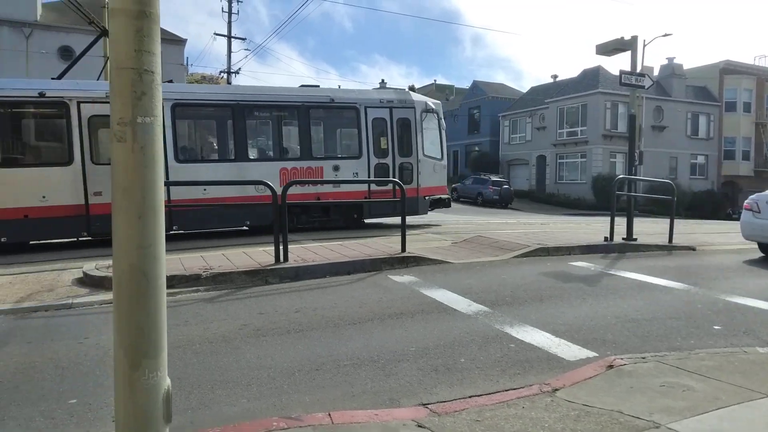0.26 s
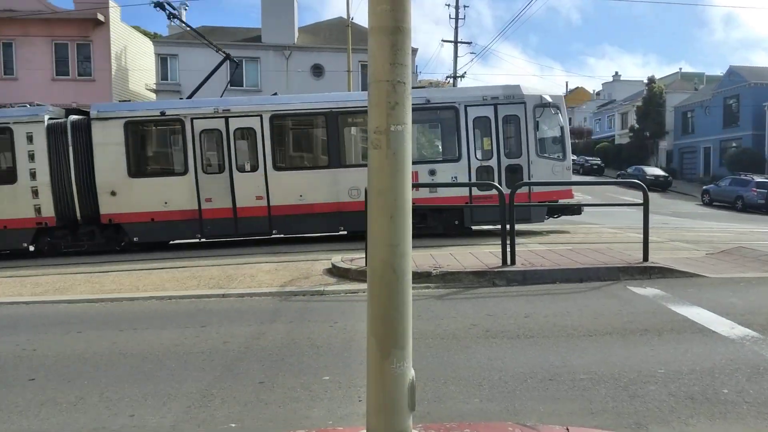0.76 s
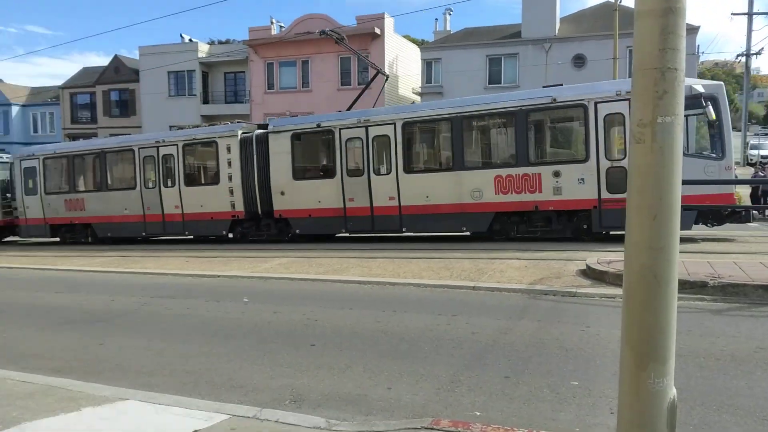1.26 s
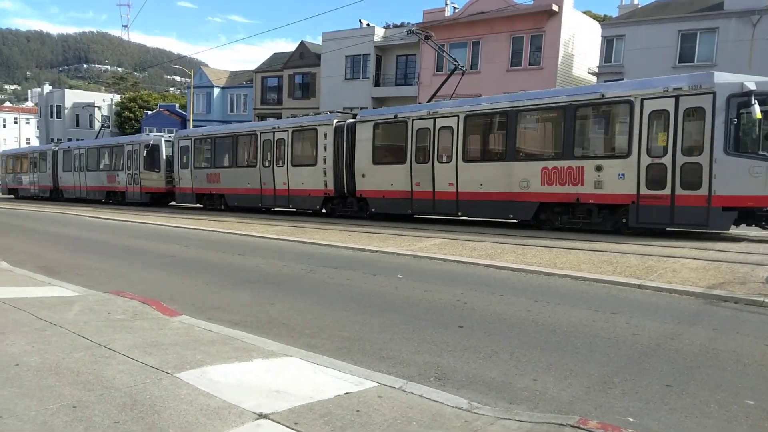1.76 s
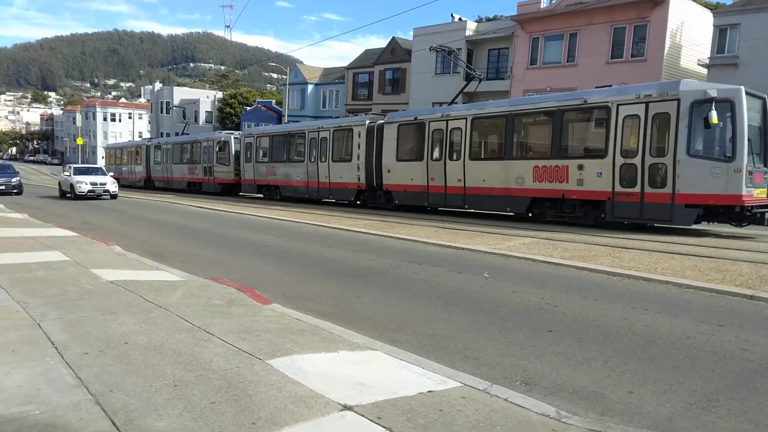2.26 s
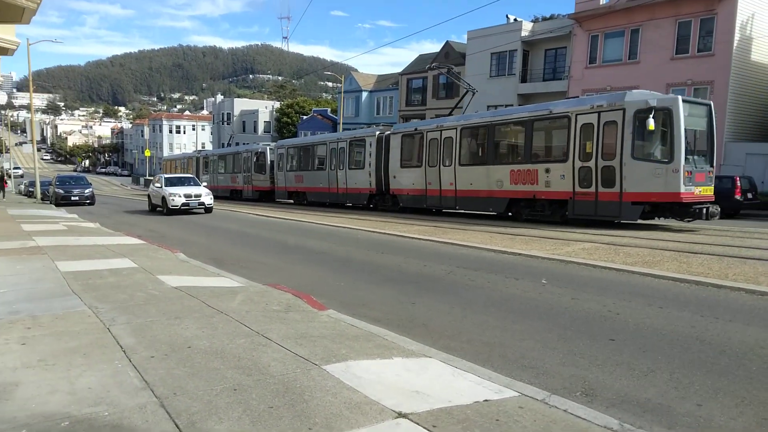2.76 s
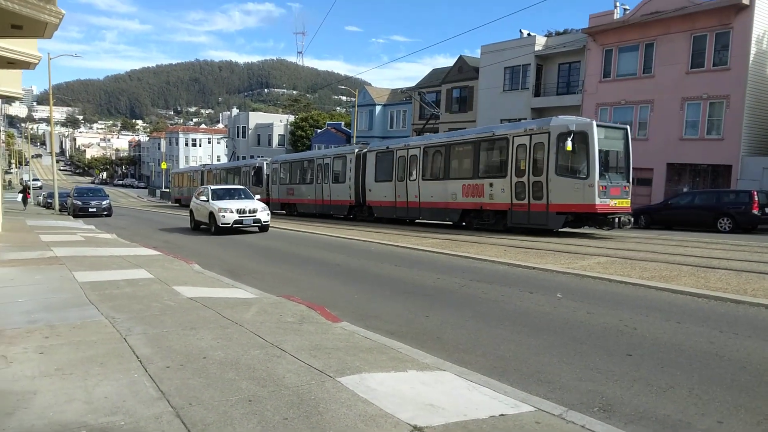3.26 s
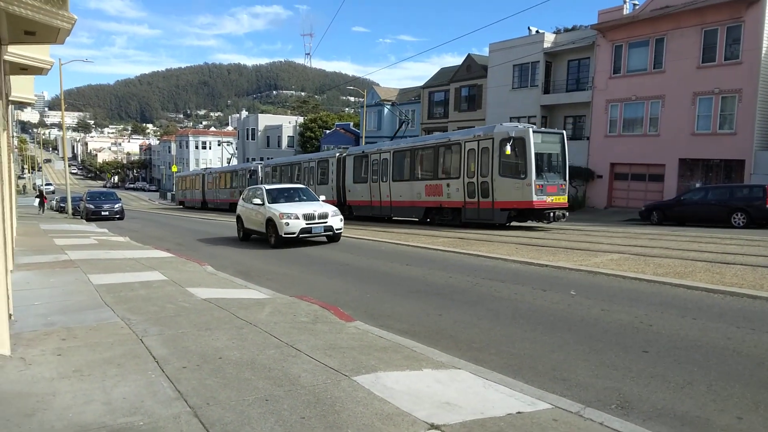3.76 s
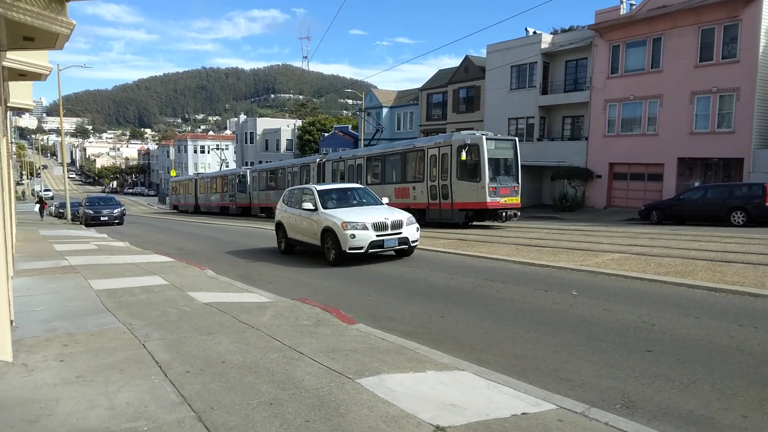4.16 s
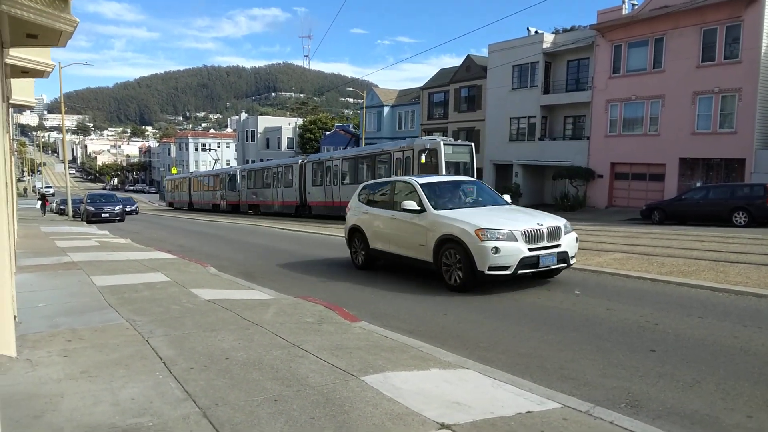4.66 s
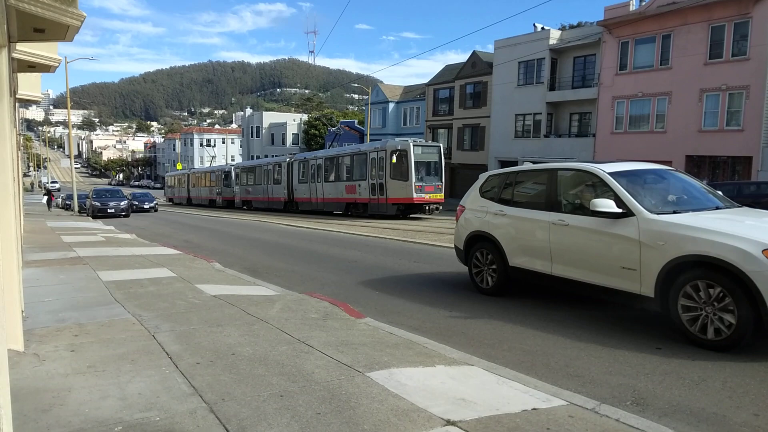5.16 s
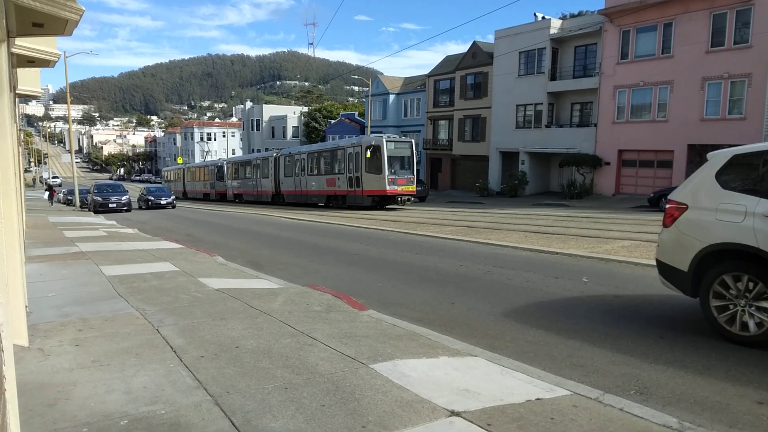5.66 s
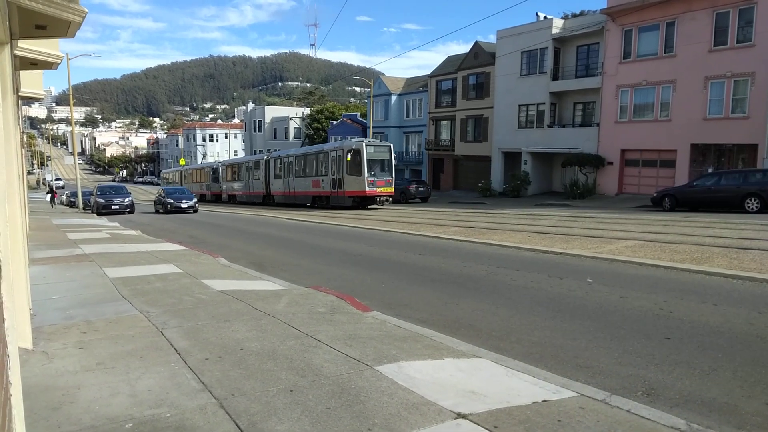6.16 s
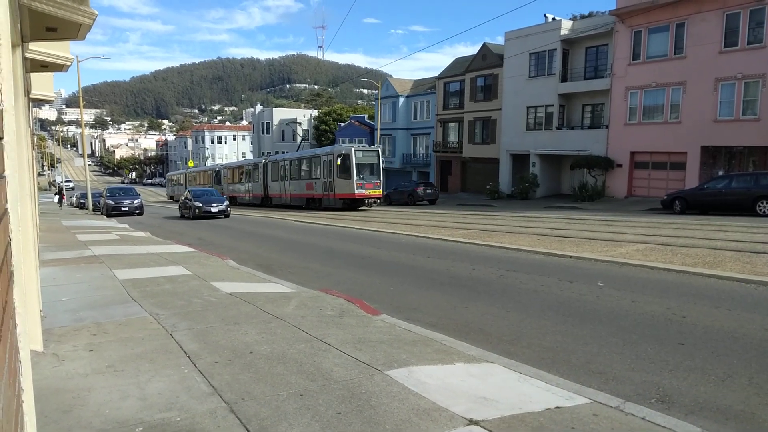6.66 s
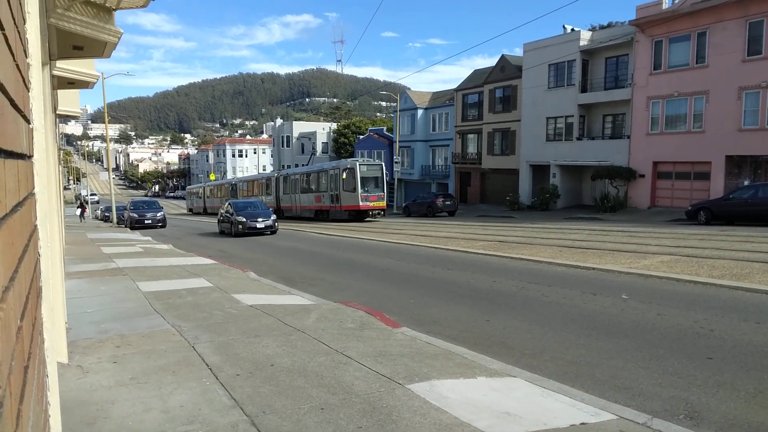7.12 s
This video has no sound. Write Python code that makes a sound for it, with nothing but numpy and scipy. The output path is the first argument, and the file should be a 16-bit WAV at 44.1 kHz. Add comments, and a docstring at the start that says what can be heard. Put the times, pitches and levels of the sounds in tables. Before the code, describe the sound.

Outdoors on a street, wind rumbles on the microphone while an electric light rail train passes close by, whining and buzzing over the roll of its wheels. A few soft, irregular knocks come from the rail joints, mostly in the first half. The train gradually fades and a car's tyres swish softly by. The gusts then take over, thumping and snapping on the right side with brief distortion.

```python
"""A street where an electric light rail train rolls past and draws away, with two cars on the road.
The train is rumble, rolling noise and hiss, a resonant whine, the pulse buzz of its two power
choppers and soft knocks of the wheels over rail joints. Gusts buffet the two microphone ports
of a small camera, the right one hard enough to overload it."""
import sys
import numpy as np
from scipy import signal
from scipy.fft import rfft, irfft, next_fast_len
from scipy.io import wavfile
from scipy.ndimage import uniform_filter1d, map_coordinates

SR = 44100
rng = np.random.default_rng(int(sys.argv[2]) if len(sys.argv) > 2 else 0)


def bounce(signal):
    """Save signal as a 16-bit WAV file at the path given by the first command-line argument."""
    frames = np.transpose(np.atleast_2d(signal))
    limited = np.clip(frames, -1, 1)
    pcm = np.round(limited * 32767).astype(np.int16)
    wavfile.write(sys.argv[1], SR, pcm)


N = 325896


def amp(db):
    """Decibels to gain."""
    return 10 ** (np.asarray(db) / 20)


def unit(x):
    """Scaled to rms 1."""
    return x / np.sqrt(np.mean(x ** 2) + 1e-20)


def panned(db):
    """Left and right gains for a pan given in dB of left over right."""
    return amp([db / 2, -db / 2])


def along(points, hz):
    """Interpolates (Hz, value) points on a log frequency axis."""
    freqs, values = np.transpose(points)
    return np.interp(np.log(hz + 1), np.log(freqs + 1), values)


def eq(points):
    """Frequency response through (Hz, dB) points."""
    return lambda hz: amp(along(points, hz))


def peaks(modes):
    """Frequency response of summed (Hz, width in Hz, dB) resonances."""
    return lambda f: sum(amp(db) * f * w / np.abs(c * c - f * f + 1j * f * w) for c, w, db in modes)


def curves(rows):
    """One value per sample for each column after the time."""
    times, *columns = np.transpose(rows)
    return np.array([np.interp(np.arange(N) / SR, times, column) for column in columns])


def wobble(rate):
    """A smooth random curve, rate knots a second."""
    return map_coordinates(rng.standard_normal(int(N * rate / SR) + 4), [np.arange(N) * rate / SR])


def bump(t, half):
    """A flat-topped fade in and out around t = 0, down to 1/e at the half-length."""
    return np.exp(-(t / half) ** 4)


def filtered(x, response):
    """x shaped by a frequency response."""
    n = x.shape[-1]
    size = next_fast_len(n + 8192)
    return irfft(rfft(x, size) * response(np.fft.rfftfreq(size, 1 / SR)), size)[..., :n]


def rush(response, patchy_db):
    """Coloured stereo noise of rms 1 with patches of random gain, narrow in the bass and wide above."""
    # Stereo image. Each row: frequency in Hz, left-right correlation.
    likeness = [(60, 0.87), (170, 1), (510, 0.76), (1470, 0.071), (4250, -0.026), (12300, -0.21)]
    spectra = signal.stft(rng.standard_normal((2, N)), nperseg=512)[2]
    patches = uniform_filter1d(rng.standard_normal(spectra.shape[1:]), size=6, axis=0)
    patches = uniform_filter1d(patches, size=12, axis=1)
    pair = signal.istft(spectra * amp(patchy_db * unit(patches)), nperseg=512)[1][:, :N]
    width = lambda hz: np.arccos(np.clip(along(likeness, hz), -1, 1)) / 2
    mid, side = filtered(pair, lambda hz: response(hz) * [np.cos(width(hz)), np.sin(width(hz))])
    return unit(np.array([mid + side, mid - side]))


def cars():
    """Tyres on asphalt, one car leaving at the start and another passing late."""
    # Traffic fader. Each row: time in seconds, level in dB.
    fader = [(0, -30.5), (.5, -28.5), (1.2, -67), (3.5, -70), (4.6, -46), (5.5, -39), (6.3, -34.5),
             (7.39, -34.5)]
    # Tyre tone. Each row: frequency in Hz, relative level in dB.
    tone = [(150, -46), (350, 3.5), (600, -5.5), (900, -16), (1500, -23.5), (2400, -11.5), (3000, -18.5),
            (5600, -36.5), (8000, -55), (12000, -94)]
    return amp(curves(fader)[0]) * rush(eq(tone), patchy_db=-1.0)


def flap_envelopes():
    """Small eddies hit a port: each gives a flap, a wider surge of air and a brief flick of speed."""
    # Each row: centre in seconds, port (0 left, 1 right), level in dB, half-length in milliseconds.
    hits = [(0.292, 0, -15, 20), (0.44, 1, -15, 6.8), (1.438, 1, -14.5, 9.6), (1.464, 1, -17, 15),
            (1.489, 0, -12, 6.2), (1.519, 0, -6.5, 3.2), (1.533, 0, -9.5, 2.2), (2.24, 1, -13, 11),
            (3.361, 1, -14, 7.8), (4.668, 1, -7, 6.9), (4.758, 1, -13, 2.92), (4.77, 1, -17.5, 2.25),
            (4.785, 1, -13, 3), (4.797, 1, -11, 3.1), (4.815, 1, -13, 3.14), (4.833, 1, -13, 3.5),
            (4.864, 1, -7.5, 5.2), (4.877, 1, -11, 3.3), (4.884, 1, -9.5, 2.9), (5.007, 1, -13.5, 6.14),
            (5.204, 1, -16.5, 8.1), (5.746, 1, -9, 6.06), (5.807, 1, -12.5, 7), (5.923, 1, -12, 4.45),
            (5.934, 1, -12, 4.3), (6.017, 1, -9, 4.85), (6.059, 1, -13, 8.9), (6.094, 1, -5, 4.8),
            (6.192, 1, -15.5, 17.2), (6.246, 1, -4.5, 9.8), (6.3, 1, -2.5, 6.36), (6.342, 1, -6, 6.2),
            (6.361, 1, -3, 9.1), (6.376, 1, -2, 7.05), (6.391, 1, -4.5, 7.14), (6.419, 1, -7, 4.7),
            (6.423, 0, -18, 13), (6.472, 1, -7.5, 11), (6.518, 1, -11, 18.2), (6.549, 1, -11, 5.36),
            (6.602, 1, -9.5, 6.75), (6.637, 1, -15, 11.2), (6.679, 1, -7.5, 15.4), (6.708, 1, -6, 5),
            (6.735, 1, -10, 6.9), (6.752, 1, -6.5, 4), (6.762, 1, -4, 5.04), (6.779, 1, -4, 5.94),
            (6.808, 1, -1.5, 4.88), (6.82, 1, -5, 2.8), (6.83, 1, -2.5, 6.03), (6.84, 1, -4, 3.5),
            (6.87, 1, -13, 4.35), (7.081, 1, -6, 4.13), (7.091, 1, -2, 4.93), (7.184, 1, -11, 27.7),
            (7.232, 1, -7.5, 9.7)]
    surge_db, surge_s, flick_db, flick_s = -9, .012, 5, .0012
    pad = 4096
    t = np.arange(-pad, pad) / SR
    flaps, surge_power, flicks = np.zeros((3, 2, N + 2 * pad))
    for centre, port, db, half_ms in hits:
        span = np.s_[round(port), round(centre * SR):round(centre * SR) + len(t)]
        flaps[span] += amp(db) * bump(1000 * t, half_ms)
        surge_power[span] += amp(db + surge_db) ** 2 * np.exp(-(t / surge_s) ** 2)
        flicks[span] += flick_db * np.exp(-(t / flick_s) ** 2)
    return [envelope[:, pad:N + pad] for envelope in (flaps, surge_power, flicks)]


def flutter(flaps, flicks):
    """Bright flaps: a flat-topped pressure swing that lurches in speed, quickest in mid-flap."""
    # Crackle tone. Each row: frequency in Hz, relative level in dB.
    tone = [(300, -15), (700, 12.5), (1000, -9), (1800, -17), (2800, -26), (5000, -41), (9000, -100)]
    base_hz, fastest_hz = 210.2, 1200
    speed = amp([3 * wobble(120) + 3.5 * wobble(600) + 4 * flap + flick
                 for flap, flick in zip(flaps, flicks)])
    phase = 2 * np.pi * np.cumsum(np.minimum(base_hz * speed, fastest_hz), axis=1) / SR
    swing = flaps * np.tanh(1.46 * np.sin(phase))
    crackle = unit(filtered(rng.standard_normal((2, N)), eq(tone)))
    return swing + amp(-11.5) * flaps ** 2 * crackle  # only the hardest flaps break up into noise


def buffeting(db):
    """Low eddies at one port; faster air is louder and carries them by more quickly."""
    # Eddy tone at normal speed. Each row: frequency in Hz, relative level in dB.
    tone = [(12, -6), (30, -3), (60, 1), (100, 1), (180, -4.5), (300, -14), (500, -26), (900, -44.5),
            (2000, -93), (6000, -110)]
    lumps_db = 1.1 * wobble(25)
    speed = np.clip(amp(.2 * (db + 15) + .4 * lumps_db + 1.2 * wobble(40)), .3, 2)
    position = np.cumsum(speed)
    eddies = unit(filtered(rng.standard_normal(round(position[-1]) + 8), eq(tone)))
    passing = map_coordinates(eddies, [position], order=1)
    return amp(db) * unit(amp(lumps_db) * np.tanh(1.2 * passing))  # wide swings even out


def wind():
    """Gusts flap and buffet each port on its own, with sharp snaps on the right."""
    # Steady push of the air. Each row: time in seconds, left level in dB, right level in dB.
    push = [(0, -28, -20.5), (.45, -27, -17), (1.05, -23, -27), (1.25, -19, -20), (2, -28, -26),
            (2.5, -22, -22), (2.9, -30, -24), (3.5, -27, -20), (3.85, -29.5, -23), (4.1, -29, -17),
            (4.28, -27, -28), (4.38, -24, -15.5), (4.6, -22, -17), (4.655, -16, -14), (4.67, -12.5, -7),
            (4.685, -15, -21.5), (4.745, -19, -19), (4.757, -23.5, -5.5), (4.815, -21, -5.5),
            (4.835, -19, -9), (4.88, -18, -8.5), (4.892, -14, -21), (4.97, -20.5, -18), (5.06, -16, -18),
            (5.3, -29, -15), (5.65, -26, -17), (5.93, -27, -15), (6.02, -15.5, -11), (6.12, -22, -9.5),
            (6.21, -17, -13), (6.245, -20, -4), (6.265, -22.5, -17), (6.285, -23, -15), (6.295, -23.5, -3),
            (6.4, -18, -5), (6.48, -10, -4), (6.495, -11, -15), (6.515, -12.5, -15), (6.525, -12, -4),
            (6.55, -15, -7), (6.565, -14.5, -15), (6.59, -15, -14), (6.6, -14.5, -5.5), (6.615, -14, -13),
            (6.66, -14, -12), (6.69, -14, -5), (6.715, -15, -11), (6.74, -15, -5), (6.8, -15, -6),
            (6.84, -15, -6), (6.87, -14, -7), (6.92, -18, -11), (6.97, -23.5, -17), (7.05, -12, -17.5),
            (7.13, -17.5, -13.5), (7.2, -19, -10), (7.26, -20.5, -16), (7.39, -20, -9.5)]
    # Sudden pressure edges. Each row: start in seconds, level in dB.
    snaps = [(5.962, -14), (6.0671, -14), (6.0984, -12), (6.2385, -27), (6.251, -4), (6.299, -11),
             (6.306, -4), (6.317, -16.5), (6.3298, -14), (6.341, -7.5), (6.362, -3), (6.3761, -15),
             (6.3814, -16), (6.4692, -19), (6.484, -17), (6.5217, 1), (6.5341, -9), (6.597, -7),
             (6.6759, -13), (6.6965, -18), (6.746, -12), (6.7546, -12), (6.7615, -8), (6.7707, -16),
             (6.7786, 0), (6.789, -14), (6.8081, -10), (6.8131, -9), (6.8206, -16), (6.8279, -2),
             (6.832, -5), (6.84, -9), (6.869, -17), (7.0823, -16), (7.09, 1), (7.221, -20), (7.2312, -10.5)]
    flaps, surge_power, flicks = flap_envelopes()
    pressure = flutter(flaps, flicks)
    for port, steady_db in enumerate(curves(push)):
        gust_db = 10 * np.log10(amp(steady_db + 1.4 * wobble(11)) ** 2 + surge_power[port])
        pressure[port] += (1 + .9 * flaps[port]) * buffeting(gust_db)  # a flap rides a stronger push
    t = np.arange(400) / SR
    edge = (1 - np.exp(-t / .0001)) * np.exp(-t / .0012)
    for start, db in snaps:
        right = pressure[1, round(start * SR):][:len(t)]
        right -= np.sign(right[0]) * amp(db) * edge  # kicks against the swing
    return pressure


def knocks():
    """Wheels strike rail joints; the street smears the blows into short puffs that ring in the wheels."""
    # Each row: start in seconds, clack level in dB, thud level in dB, attack and 60 dB decay in seconds.
    blows = [(0.4898, -50, -47, .003, .23), (0.823, -29, -26, .003, 0.26), (0.9294, -36, -30, .003, .23),
             (1.1014, -46, -20, 0.0017, 0.082), (1.485, -51, -46, .003, .23),
             (2.0863, -27, -28, .003, 0.19), (2.5227, -33.5, -29, .003, .23), (2.7894, -36, -45, .006, 0.2),
             (2.8868, -40.5, -32.5, .003, 0.26), (2.9394, -37, -35, 0.0028, 0.2),
             (3.2744, -34, -27, 0.016, 0.36), (4.779, -33, -27.5, 0.0055, 0.31)]
    # Tones of the bright clack and the duller thud. Each row: frequency in Hz, relative level in dB.
    clack_tone = [(1000, -46), (3000, 1.5), (4500, -4), (5500, -7), (6800, -5), (7800, -4.5), (10500, -14),
                  (13000, -30), (16000, -32)]
    thud_tone = [(300, -28), (700, 5.5), (1800, 5), (3500, -3), (5000, -35), (8000, -90)]
    # Wheel resonances. Each row: frequency in Hz, width in Hz, relative level in dB.
    wheel_modes = [(2590, 64, -5), (2750, 100, -8), (3800, 480, 8.5), (4250, 16, 14), (4200, 24, -7),
                   (4500, 11, -3), (4660, 19, 2), (5200, 87, -16), (5540, 98, -24), (7560, 230, -14)]
    clack_level, thud_level = np.zeros((2, N + SR))
    t = np.arange(SR // 4) / SR
    for start, clack_db, thud_db, attack, t60 in blows:
        puff = amp(-60 * t / t60) * (1 - np.exp(-t / attack))
        clack_level[round(start * SR):][:len(t)] += amp(clack_db) * puff
        thud_level[round(start * SR):][:len(t)] += amp(thud_db) * puff
    clack = rush(lambda hz: eq(clack_tone)(hz) * (amp(-5) + peaks(wheel_modes)(hz)), patchy_db=1.2)
    thud = rush(eq(thud_tone), patchy_db=2.1)
    return clack_level[:N] * clack + thud_level[:N] * thud


def rumble(loss_db):
    """The low weight of the rolling train."""
    # Rumble tone. Each row: frequency in Hz, relative level in dB.
    tone = [(12, -51), (20, -12.5), (81, 3), (140, -1), (189, 0), (277, -2.5), (549, -24.5), (634, -17),
            (900, -29), (1170, -14), (1980, -120)]
    return amp(-19.5 - .94 * loss_db + .23 * wobble(4.4)) * rush(eq(tone), patchy_db=1.0)


def rolling(loss_db, shake):
    """Midrange roar of wheels on uneven rail."""
    # Rolling tone. Each row: frequency in Hz, relative level in dB.
    tone = [(250, -1), (450, -4), (700, -0.5), (950, -17), (1400, -9), (1850, -4.5), (2300, -11),
            (2900, -10.5), (3230, -9.5), (3370, -4.5), (3560, -10), (3720, -12.5), (4200, -15.5),
            (7000, -97)]
    return amp(-30 - .81 * loss_db + 1.44 * shake) * rush(eq(tone), patchy_db=.83)


def hiss(loss_db, shake):
    """The train's flickering treble noise."""
    # Hiss tone. Each row: frequency in Hz, relative level in dB.
    tone = [(2500, -36), (3500, 2), (4350, -19.5), (4900, -10), (5400, -15), (6460, -19.5), (7720, -13.5),
            (8500, -21.5), (9100, -27.5), (10500, -27.5), (11300, -41.5), (11900, -40), (12700, -37),
            (13300, -39), (16000, -46)]
    return amp(-39.5 - .97 * loss_db + .2 * shake) * rush(eq(tone), patchy_db=2.6)


def whine(pan_db):
    """Narrow resonances near 1.1 kHz that drift, thin out with distance and at times firm into a tone."""
    # Resonances close by and from afar. Each row: frequency in Hz, width in Hz, relative level in dB.
    near_modes = [(1081.5, 23, 5.5), (1037, 22, -5), (1112, 26, -2.5), (946, 54, -9.5)]
    far_modes = [(1085, 11.5, 1), (1123, 12, -4)]
    # Near-to-far crossfade. Each row: time in seconds, far share of the power.
    crossfade = [(0, 0), (4.6, .1), (5.5, .8), (7.39, .92)]
    # Pitch drift. Each row: time in seconds, percent sharp.
    glide = [(0, 0), (.3, -.6), (.7, -.8), (1.2, 1), (1.9, .8), (2.6, .5), (3.2, 0), (4, .5), (4.8, .3),
             (5.6, -.4), (6.3, .5), (7.39, 0)]
    # Clear tones. Each row: centre in seconds, pitch in Hz, peak in dB over the noise,
    # half-length in seconds.
    clear_tones = [(.2, 1080, 1, .13), (2.6, 1083, -1, .22), (5.65, 1097, -1, .2), (6.3, 1097, 0, .1),
                   (7.0, 1095, 1, .12)]
    # Whine fader. Each row: time in seconds, level in dB.
    fader = [(0, -28), (.3, -29), (.57, -34.5), (.72, -30), (1.75, -29), (2.8, -29.5), (3.05, -33),
             (3.3, -32), (3.43, -34.5), (3.55, -31.5), (4.1, -33.5), (4.9, -37.5), (5.6, -35.5),
             (6.15, -35), (6.3, -30.5), (6.6, -33), (6.85, -35), (7.05, -32.5), (7.2, -37.5), (7.39, -35)]
    near, far = (rush(lambda hz: peaks(modes)(hz) / (1 + (hz / 2500) ** 4), patchy_db=-.4)
                 for modes in (near_modes, far_modes))
    far_share = curves(crossfade)[0]
    ring = np.sqrt(1 - far_share) * near + np.sqrt(far_share) * far
    position = np.cumsum(1 + curves(glide)[0] / 100)
    ring = np.array([map_coordinates(side, [position], mode='mirror') for side in ring])
    t = np.arange(N) / SR
    for centre, hz, db, half in clear_tones:
        phase = 2 * np.pi * np.cumsum(hz + 6 * wobble(12)) / SR
        ring += amp(db) * bump(t - centre, half) * np.sin(phase)
    return amp(curves(fader)[0] + .66 * wobble(9)) * panned(pan_db) * ring


def chopper_pulses(pitch_hz):
    """Two power choppers, slightly out of tune: each pulse train gives a comb of harmonics."""
    # Each row: detuning in percent, relative level in dB.
    choppers = [(0, 0), (.36, -5)]
    comb, taps = np.zeros(N), np.arange(-8, 8)
    for detune, db in choppers:
        rate = pitch_hz * (1 + (detune + .035 * wobble(9)) / 100)
        turns = np.cumsum(rate) / SR
        onsets = np.flatnonzero(np.diff(np.floor(turns))) + 1
        late = turns[onsets] % 1 * SR / rate[onsets]  # part of a sample since the pulse
        pulses = np.sinc(taps + late[:, None]) * np.hanning(18)[1:-1]
        samples = np.clip(onsets[:, None] + taps, 0, N - 1)
        comb += amp(db) * np.bincount(samples.ravel(), pulses.ravel(), N)
    return comb


def chopper_buzz(loss_db):
    """The choppers' buzz dulls as the train fades; reflections make every harmonic fade on its own."""
    # Chopper pitch. Each row: time in seconds, pulses per second.
    pulse_rate = [(0, 199.1), (.4, 198.8), (.9, 198.2), (1.5, 197.8), (2.2, 197.6), (4.4, 197.6),
                  (5.5, 197.85), (6.7, 198.3), (7.39, 198.4)]
    # Buzz tone. Each row: frequency in Hz, relative level in dB.
    tone = [(1500, -35), (3000, -7), (3500, 10), (4000, -1), (4300, 0.5), (4550, 2), (4750, 3.5),
            (4950, 0.5), (5300, -8.5), (5900, -6.5), (6400, -10.5), (6900, -2.5), (7200, -20), (7520, -11),
            (8500, -9.5), (9500, -15.5), (11250, -15.5), (11900, -25), (12600, -11.5), (13000, -12),
            (13300, -83)]
    # Single harmonics swell or dip. Each row: centre in seconds, harmonic number, gain in dB,
    # half-length in seconds.
    swells = [(0.971, 24, 4.5, .2), (0.77, 22, 4.5, .2), (1.15, 23, -2, 0.09), (3.5, 20, 11, 0.22),
              (1.8, 21, 2, 0.23), (2.1, 25, 4, 0.44), (2.1, 24, 5, 0.37), (2.7, 22, 5, 0.24),
              (2.45, 23, 3, .25), (2.753, 24, 2, 0.27), (3.25, 20, 5, .2), (4.2, 38, 15, 0.98),
              (6, 24, 6.5, 0.49)]
    dulling = .085  # dB per kHz for each dB of level loss
    level = amp(-44 - .69 * loss_db + 1.6 * wobble(3.9))
    pitch_hz = curves(pulse_rate)[0]
    hz, t, spectra = signal.stft(chopper_pulses(pitch_hz), SR, nperseg=2048)
    frame_loss_db = np.interp(t, np.arange(N) / SR, loss_db)
    gain_db = along(tone, hz)[:, None] - dulling * np.outer(hz / 1000, frame_loss_db)
    for centre, harmonic, db, half in swells:
        band = np.abs(hz / pitch_hz.mean() - round(harmonic)) < .5
        gain_db += db * np.outer(band, bump(t - centre, half))
    reflections = uniform_filter1d(rng.standard_normal((2, *spectra.shape)), size=7, axis=1)
    reflections = unit(uniform_filter1d(reflections, size=14, axis=2))
    spectra = spectra * amp(gain_db + 2.2 * reflections) * np.exp(1.5j * reflections[::-1])
    return level * unit(signal.istft(spectra, SR, nperseg=2048)[1][:, :N])


def train():
    """Rumble, rolling, whine, hiss and buzz draw away together; the air takes the top first."""
    # Each row: time in seconds, level loss in dB, whine pan and treble pan in dB. The train fades
    # with distance, then ducks briefly near 6.9 s as the camera's gain control dips.
    moves = [(0, 0, 4, -13.5), (.5, 0.5, -5.5, -9.5), (1, -0.5, -6.5, -8), (1.6, 0, -5, -6),
             (2.3, 1.5, -2.5, -3), (3, 3.5, -3.5, -1), (3.7, 5.5, -6, -1.5), (4.4, 7, -4.5, -4.5),
             (5.5, 7.5, -6.5, -3), (6.8, 8.5, -4.5, -3.5), (6.92, 13, -2.5, -7), (7.39, 10.5, -7, -7)]
    loss_db, whine_pan, treble_pan = curves(moves)
    shake = wobble(8)  # uneven rail shakes rolling and hiss together
    body = rumble(loss_db) + rolling(loss_db, shake) + whine(whine_pan)
    treble = panned(treble_pan) * (hiss(loss_db, shake) + chopper_buzz(loss_db))
    top = filtered(treble, lambda hz: 1 / (1 + (9500 / (hz + 1)) ** 8))
    lost_top = (1 - amp(-.16 * loss_db)) * top
    return body + treble - lost_top


def scene():
    """The street as coloured by each port, with the wind on top."""
    # Port colouring. Each row: frequency in Hz, left over right in dB.
    port_balance = [(300, 0.5), (1300, 1), (1900, 2.5), (2500, -3.5), (3500, 4), (5000, 8.5), (7500, 13.5),
                    (8800, 11.5), (10000, -9.5), (11500, -16.5), (12600, -1)]
    street = train() + knocks() + cars()
    return filtered(street, lambda hz: panned(along(port_balance, hz))) + wind()


def record(dry):
    """The converter overloads at full scale with a small knee; the band ends at 15.8 kHz."""
    limited = dry / (1 + np.abs(dry) ** 11) ** (1 / 11)
    return np.clip(filtered(limited, lambda hz: hz < 15800), -1, 1)


dry = scene()
out = record(dry)
bounce(out)
```